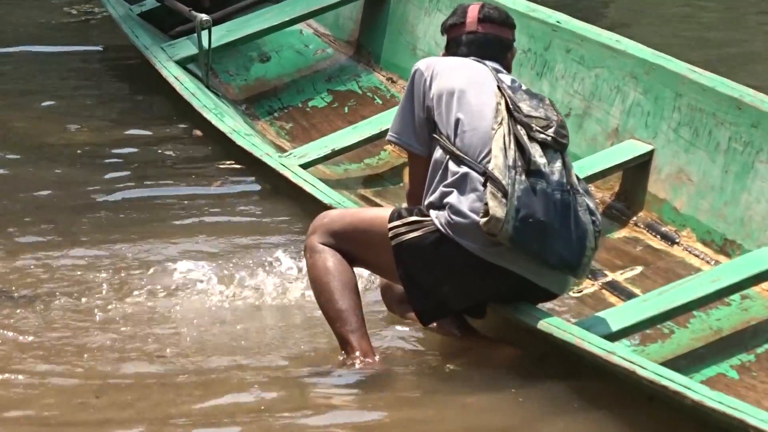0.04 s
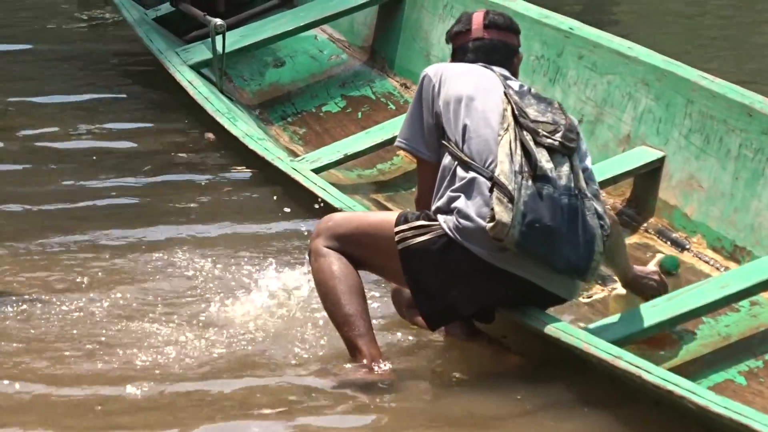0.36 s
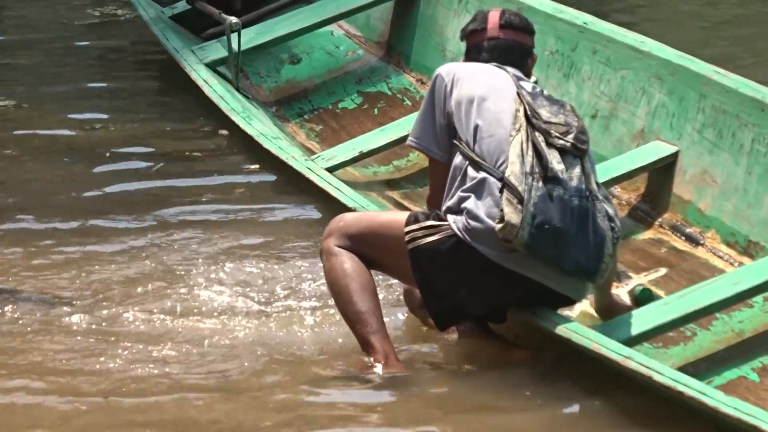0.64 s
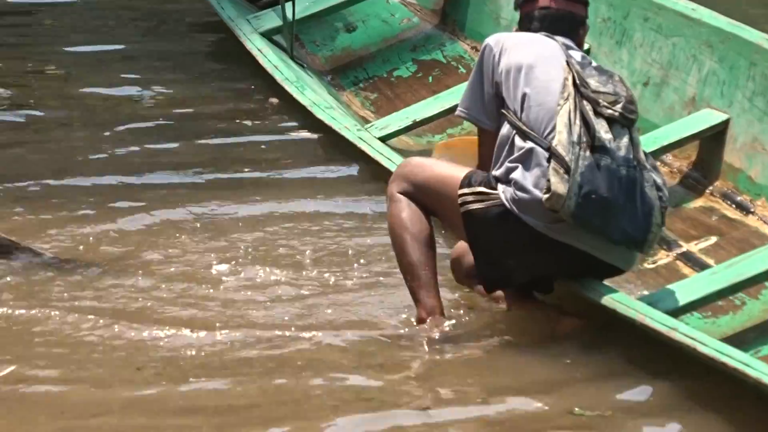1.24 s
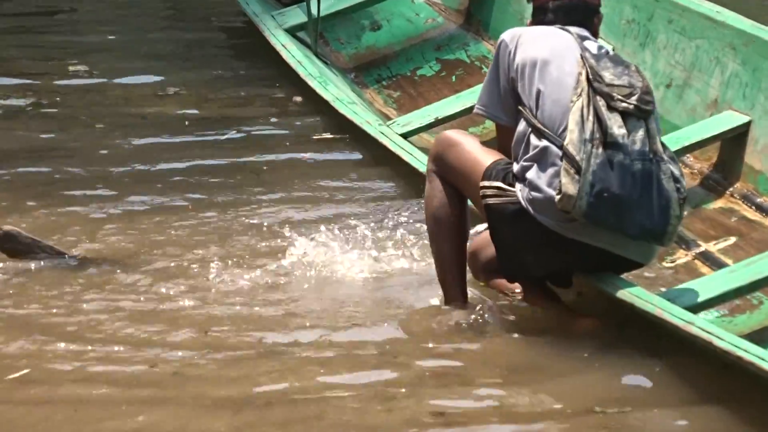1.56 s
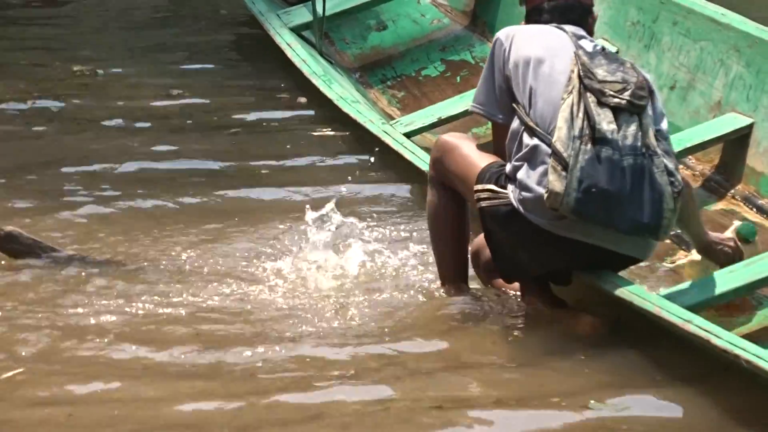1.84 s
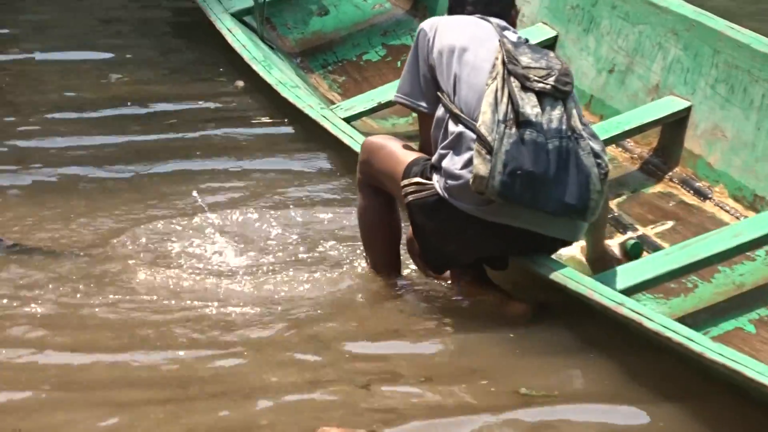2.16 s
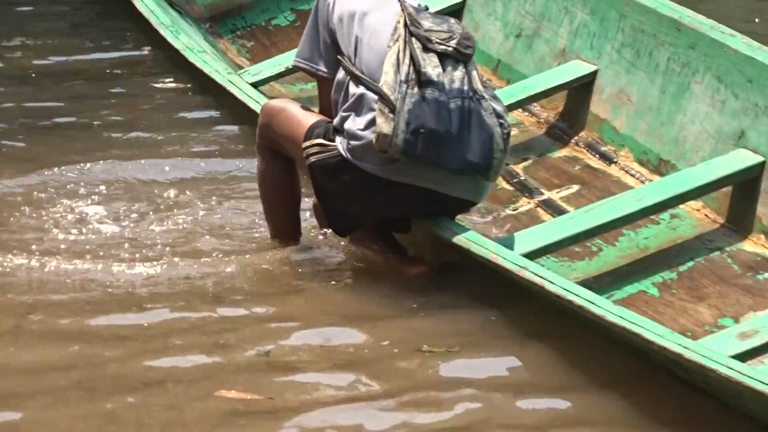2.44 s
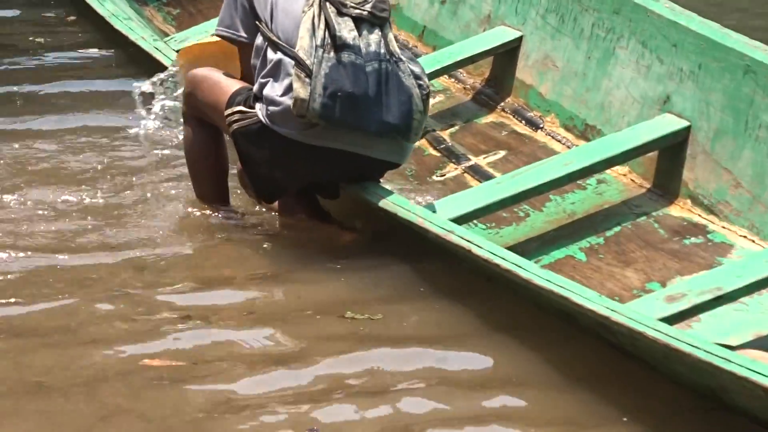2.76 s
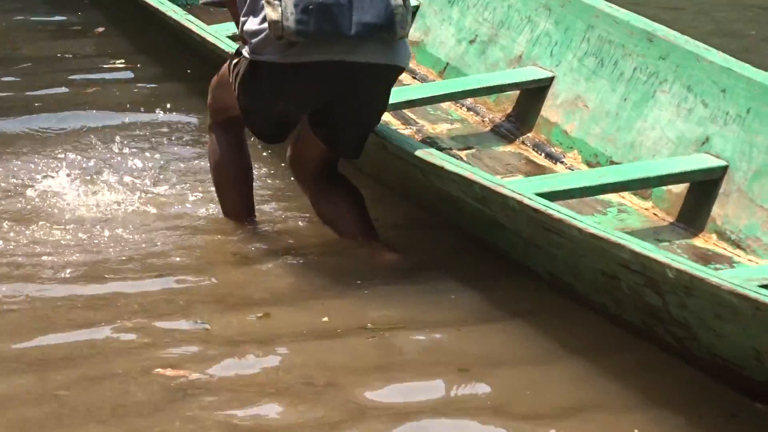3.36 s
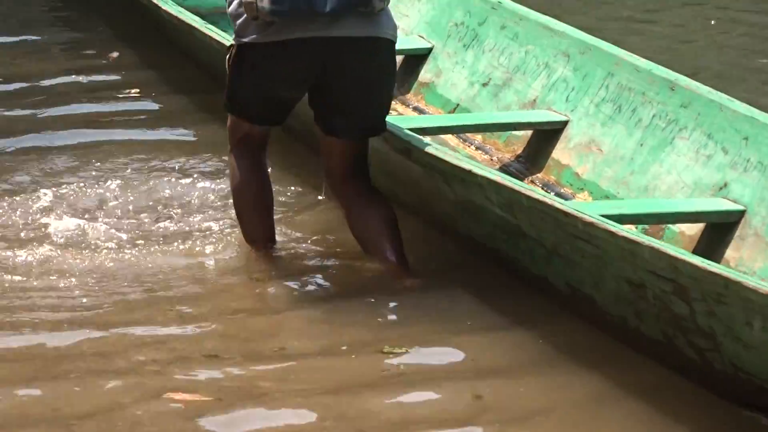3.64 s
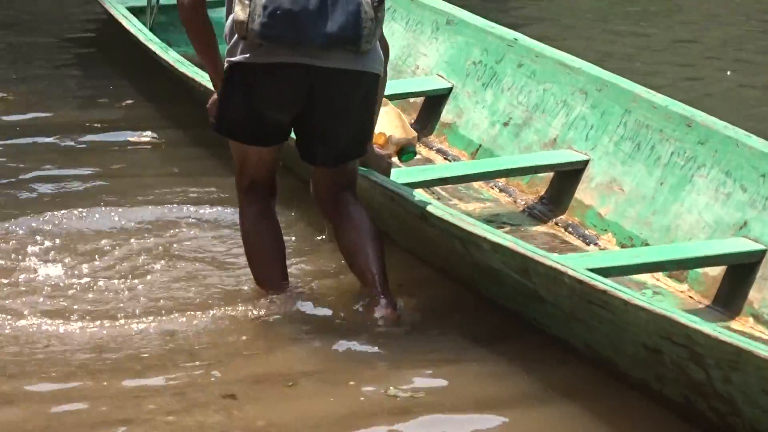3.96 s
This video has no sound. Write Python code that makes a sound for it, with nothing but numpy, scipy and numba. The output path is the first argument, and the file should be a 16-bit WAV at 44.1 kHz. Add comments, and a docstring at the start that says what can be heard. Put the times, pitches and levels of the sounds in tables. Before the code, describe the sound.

Water thrown from a wooden boat splashes onto a calm river three times: right at the start, at about 1.5 seconds and at about 2.9 seconds. Each splash slaps and sprays, then bubbles and fizzes. Soft sloshing and glugs follow near 0.6, 2.1 to 2.6 and 3.5 seconds. Stray drops patter between throws over quiet trickling, and a faint, thin chirp comes at about 0.7 seconds.

```python
"""Three splashes of water, bailed from a wooden boat and thrown onto a calm river.
Each scoopful lands as a sheet of spray, plunges under in a burst of bubbles, then sloshes back.
Single slaps and the glugs of ringing air pockets stand out. Between the throws stray drops
patter, the river trickles quietly and a thin chirp comes once from the bank."""
import sys
import numpy as np
from scipy import signal
from scipy.fft import rfft, irfft
from scipy.io import wavfile
from scipy.ndimage import uniform_filter1d
from numba import njit

SR = 44100
rng = np.random.default_rng(int(sys.argv[2]) if len(sys.argv) > 2 else 0)


def pcm_store(signal):
    """Save signal as 16-bit PCM."""
    levels = np.round(np.clip(np.atleast_2d(signal), -1, 1) * 32767)
    wavfile.write(sys.argv[1], SR, levels.astype(np.int16).T)


N = 176400
T = np.arange(N) / SR
BUBBLE_RISE_CYCLES, BUBBLE_GLIDE = 1.01, 0.0781  # glide: relative pitch rise per decay time
THROW_ATTACK_S = 0.0047


def amp(db):
    """Decibels to gain."""
    return 10 ** (np.asarray(db) / 20)


def unit(x):
    """Scales to rms 1."""
    return x / np.sqrt(np.mean(x ** 2) + 1e-20)


def lookup(points, hz):
    """Reads a table on a log-frequency axis."""
    freq_hz, value = np.transpose(points)
    return np.interp(np.log(hz + 1), np.log(freq_hz), value)


def add(mix, start_s, sound):
    """Mixes a sound in at start_s."""
    part = mix[:, max(round(start_s * SR), 0):][:, :sound.shape[-1]]
    part += sound[..., :part.shape[1]]


def colour(x, spectrum):
    """Minimum-phase filter with the given spectrum."""
    log_gain = np.log(amp(lookup(spectrum, abs(np.fft.fftfreq(4096, 1 / SR)))))
    taps = np.fft.ifft(np.exp(np.conj(signal.hilbert(log_gain)))).real[:2048]
    return signal.oaconvolve(x, taps[None], axes=1)[:, :N]


def low_cut(x, corner_hz=283):
    """Removes the bass."""
    return signal.sosfilt(signal.butter(4, corner_hz, "high", fs=SR, output="sos"), x)


def churn(depth_db, per_s):
    """Random surges of level."""
    knots = rng.uniform(-1, 1, 1000)
    return amp(depth_db * np.interp(T * per_s, np.arange(len(knots)), knots))


# Stereo width: freq_hz, side_gain
STEREO_WIDTH = [(70, .85), (300, .42), (4000, .3), (8000, .1)]

def spread(mid, side, hz):
    """Mid and side to left and right, widest in the bass."""
    side = side * lookup(STEREO_WIDTH, hz)
    return np.array([mid + side, mid - side])


@njit
def ring_all(starts, hz, gains, cycles, glide):
    """Sums dying rings into two channels; glide bends their pitch upward."""
    out = np.zeros((2, N))
    for k in range(len(starts)):
        freq = hz[k] / SR  # cycles per sample
        step = np.exp(-freq / cycles + 2j * np.pi * freq)
        bend = np.exp(2j * np.pi * freq * freq * glide / cycles)
        opening = np.exp(-freq / BUBBLE_RISE_CYCLES)
        ring, shut = 1 + 0j, 1.
        for i in range(starts[k], min(N, starts[k] + int(5 * cycles / freq))):
            out[0, i] += gains[0, k] * ring.imag * (1 - shut)
            out[1, i] += gains[1, k] * ring.imag * (1 - shut)
            ring, step, shut = ring * step, step * bend, shut * opening
    return out


def cloud(spectrum, level, per_s, cycles, size_db, wash, glide=BUBBLE_GLIDE, lag_s_per_octave=0):
    """Drops and bubbles of random size ring over a hiss of tiny ones; lag delays the low ones."""
    when, pitch, size, place = rng.random((50000, 4))[:int(per_s * N / SR)].T
    hz = np.interp(pitch, [0, 1], np.array([250, 15500]) ** .3) ** (1 / .3)
    lag_s = lag_s_per_octave * np.log2(1000 / hz)
    gain = amp(size_db * np.minimum(-np.log(1 - size), 3)) * hz ** .85
    gain *= np.interp(when * N / SR - lag_s, T, level)
    gains = spread(gain, gain * np.sqrt(2) * np.cos(np.pi * place), hz)
    swarm = ring_all((when * N).astype(np.int64), hz, gains, float(cycles), float(glide))
    noise = rfft(rng.standard_normal((2, N)))
    hiss = irfft(spread(*noise, np.fft.rfftfreq(N, 1 / SR)), N)
    water = colour(unit(swarm) + wash * unit(hiss * level), spectrum)
    return unit(water) * np.sqrt(np.mean(level ** 2))


# Trickle spectrum: freq_hz, gain_db
RIVER_SPECTRUM = [(80, -27), (220, -18.5), (850, 2.5), (1500, -5.5), (3000, -7.5), (4700, -1.5), (7200, -7),
                  (9500, -14)]

def river():
    """Distant trickling over a soft steady hiss."""
    return amp(-52) * cloud(RIVER_SPECTRUM, np.ones(N), per_s=780, cycles=13, size_db=5, wash=2.04)


def chirp(peak_s=0.746, half_length_s=0.056, pitch_hz=7050, width_hz=390, level_db=-55.5):
    """A bird or insect calls once from the bank: a thin, fuzzy tone."""
    band = np.exp(-((np.fft.rfftfreq(N, 1 / SR) - pitch_hz) / width_hz) ** 2)
    tone = unit(irfft(rfft(rng.standard_normal(N)) * band, N))
    return amp(level_db) * np.exp(-((T - peak_s) / half_length_s) ** 2) * tone


# Fine-drop spectrum: freq_hz, gain_db
DRIBBLE_SPECTRUM = [(400, -16), (7000, -8)]
# Scatters of drops: peak_s, half_length_s, level_db
STRAY_DROPS = [(1.39, 0.021, -47), (1.983, 0.17, -57), (2.858, 0.039, -45)]

def dribbles():
    """Stray drops from the scoop patter on the surface between the throws."""
    power = sum(amp(db) ** 2 * np.exp(-((T - peak_s) / half_s) ** 2)
                for peak_s, half_s, db in STRAY_DROPS)
    return cloud(DRIBBLE_SPECTRUM, np.sqrt(power), per_s=2000, cycles=1.7, size_db=3.5,
                 wash=0.55, glide=0)


# Lapping spectrum: freq_hz, gain_db
SLOSH_SPECTRUM = [(180, -43.5), (380, -3.5), (750, 4), (1200, 5), (2000, -6), (3400, -4), (15000, -29)]
# Water falling back: crest_s, rise_s, fall_s, level_db
WAVELETS = [(0.62, 0.068, 0.12, -43.5), (1.2, 0.061, 0.25, -53), (2.12, 0.094, 0.058, -42),
            (2.57, 0.24, 0.13, -45.5), (3.52, 0.095, 0.16, -45)]

def sloshes():
    """The river closes over the splash and laps at hull and legs."""
    power = np.zeros(N)
    for crest_s, rise_s, fall_s, db in WAVELETS:
        from_crest = abs(T - crest_s) / np.where(T < crest_s, rise_s, fall_s)
        power += amp(db) ** 2 * np.exp(-from_crest ** 1.7)
    level = np.sqrt(power) * churn(depth_db=1, per_s=54)
    return cloud(SLOSH_SPECTRUM, level, per_s=1800, cycles=8.73, size_db=3.5, wash=0.25,
                 lag_s_per_octave=-0.012)


def bubble(hz, cycles):
    """A dying complex ring whose pitch climbs as the bubble nears the surface."""
    age_cycles = np.arange(int(6 * cycles / hz * SR) + 2) * hz / SR
    onset = 1 - np.exp(-age_cycles / BUBBLE_RISE_CYCLES)
    phase = 2 * np.pi * age_cycles * (1 + BUBBLE_GLIDE * age_cycles / cycles / 2)
    return onset * np.exp(-age_cycles / cycles + 1j * phase)


# Large air pockets: start_s, pitch_hz, level_db
AIR_POCKETS = [(.028, 3230, -32.5), (.123, 1710, -34.5), (.142, 680, -36.5), (0.261, 1557, -36),
               (.444, 1775, -43), (.563, 671, -36), (.606, 1155, -38), (.732, 830, -40.5), (.773, 750, -38),
               (.841, 970, -38.5), (0.956, 1024, -37), (1.498, 2250, -38), (1.551, 616, -30),
               (1.568, 1534, -33.5), (1.574, 1035, -36), (1.659, 665, -35), (1.761, 1634, -35.5),
               (2.1, 745, -32), (2.148, 970, -31.5), (2.18, 1174, -31), (2.42, 1100, -36.5),
               (2.457, 760, -34), (2.504, 369, -43), (2.944, 2440, -39), (3.023, 705, -34),
               (3.045, 1714, -38), (3.164, 980, -37.5), (3.169, 3160, -39), (3.274, 1760, -36),
               (3.361, 3080, -39.5), (3.45, 1610, -37.5), (3.46, 862, -39)]

def glugs(roughness=0.39):
    """Large bubbles wobble as they ring (smaller ones for more cycles) and radiate little bass."""
    out = np.zeros((2, N))
    for start_s, hz, db in AIR_POCKETS:
        ring = bubble(hz, cycles=10.5 * np.sqrt(hz / 1000))
        side_turn = np.exp(2j * np.pi * rng.random())
        noise = rng.standard_normal((2, SR))
        wobble = unit(uniform_filter1d(noise, int(2 * SR / hz), axis=1))[:, :len(ring)]
        ring *= 1 + roughness * (wobble[0] + 1j * wobble[1])
        add(out, start_s, amp(db) * spread(ring.imag, (ring * side_turn).imag, hz))
    return low_cut(out)


# Lumps landing: start_s, level_db, decay_s, centre_hz
WATER_LUMPS = [(0.018, -18.5, 0.0014, 9800), (0.022, -47, 0.013, 7000), (0.239, -30.5, 0.012, 5650),
               (0.25, -29.5, 0.0012, 7540), (1.4605, -38, 0.0073, 6200), (1.708, -32, 0.0041, 6400),
               (1.7474, -28, 0.0021, 3350), (1.9875, -35.5, 0.0029, 2280), (2.5816, -33.5, 0.0038, 910),
               (2.6237, -35.5, 0.0015, 3260), (2.9258, -27, 0.00031, 7750), (2.974, -39, 0.014, 2760),
               (3.188, -39.5, 0.031, 3600), (3.294, -33, 0.0035, 4080), (3.4092, -35, 0.002, 2570),
               (3.603, -42.5, 0.0019, 7050)]

def slaps(rise_s=0.00012, half_width_octaves=0.6, sizzle_db=-16, sizzle_s=0.038):
    """Lumps of water slap the river: each a sharp crack, then a short sizzle."""
    out = np.zeros((2, N))
    t, hz = np.arange(4096) / SR, np.fft.rfftfreq(4096, 1 / SR)
    onset = 1 - np.exp(-t / rise_s)
    sizzle = amp(sizzle_db) * np.exp(-t / sizzle_s)
    bass_rolloff = 1 / np.sqrt(1 + (300 / (hz + 1)) ** 6)
    for start_s, db, decay_s, centre_hz in WATER_LUMPS:
        band = bass_rolloff / (1 + (np.log2((hz + 1) / centre_hz) / half_width_octaves) ** 2)
        noise = np.exp(2j * np.pi * rng.random((2, len(hz))))
        burst = unit(irfft(spread(*noise, hz) * band))
        add(out, start_s, amp(db) * burst * onset * (np.exp(-t / decay_s) + sizzle))
    return low_cut(out)


# Bubble-burst spectrum: freq_hz, gain_db
PLUNGE_SPECTRUM = [(220, -41), (330, -9), (560, 6.5), (900, 9), (3200, -6), (6000, -9.5), (15000, -46)]
# Scoopfuls landing: start_s, length_s, spray_db, plunge_db
SCOOPFULS = [(0.006, 0.3, -48, -41), (1.465, 0.31, -47.5, -42), (2.934, 0.3, -45, -42.5)]

def plunges(peak_s=0.062, hold_share=0.36, rise_db_per_s=118, fall_db_per_s=41.5):
    """The bulk of each scoopful drives air under the surface, small bubbles first."""
    level = np.zeros(N)
    for start_s, length_s, _, db in SCOOPFULS:
        age_s = T - start_s
        rise_db = -rise_db_per_s * np.maximum(peak_s - age_s, 0)
        fall_db = -fall_db_per_s * np.maximum(age_s - peak_s - hold_share * length_s, 0)
        level += np.clip(age_s / THROW_ATTACK_S, 0, 1) * amp(db + rise_db + fall_db)
    level *= churn(depth_db=5.5, per_s=60)
    return cloud(PLUNGE_SPECTRUM, level, per_s=2800, cycles=7.35, size_db=3, wash=0.45,
                 lag_s_per_octave=0.022)


# Falling-sheet spectrum: freq_hz, gain_db
SPRAY_SPECTRUM = [(350, -52), (900, 6.5), (1800, -1), (3300, 4.5), (9000, 0.5), (15500, -4.5)]

def spray(front_db=14.5, front_s=0.027, sheet_fall_db_per_s=259, foam_db=-2.5, foam_fall_db_per_s=31):
    """Drops patter down, hardest at the front of the sheet, and leave fizzing foam; a few plink."""
    power = np.zeros(N)
    for start_s, length_s, db, _ in SCOOPFULS:
        age_s = np.maximum(T - start_s, 0)
        after_s = np.maximum(age_s - length_s, 0)
        onset = np.minimum(age_s / THROW_ATTACK_S, 1)
        sheet = amp(front_db * np.exp(-age_s / front_s) - sheet_fall_db_per_s * after_s)
        foam = amp(foam_db - foam_fall_db_per_s * after_s)
        power += (amp(db) * onset) ** 2 * (sheet ** 2 + foam ** 2)
    level = np.sqrt(power)
    patter = cloud(SPRAY_SPECTRUM, level, per_s=2400, cycles=1.26, size_db=0.5, wash=0.55, glide=0)
    plinks = cloud(SPRAY_SPECTRUM, level, per_s=280, cycles=23.5, size_db=2.5, wash=0)
    return patter + amp(-7.5) * plinks


def scene():
    """The splashes and the river."""
    return spray() + dribbles() + plunges() + sloshes() + slaps() + glugs() + river() + chirp()


# Microphone response: freq_hz, gain_db
MIC_RESPONSE = [(1450, -3.5), (1800, 2), (2120, -4), (2430, 0.5), (2830, -4), (3200, -0.5), (3700, -4),
                (4900, -4), (5350, -8.5), (6400, -4.5)]

def record(dry):
    """Microphone colour and band limit."""
    edge_hz = 15900
    low_pass = signal.firwin(511, edge_hz, window=("kaiser", 9), fs=SR)
    return signal.oaconvolve(colour(dry, MIC_RESPONSE), low_pass[None], "same")


dry = scene()
out = record(dry)
pcm_store(out)
```